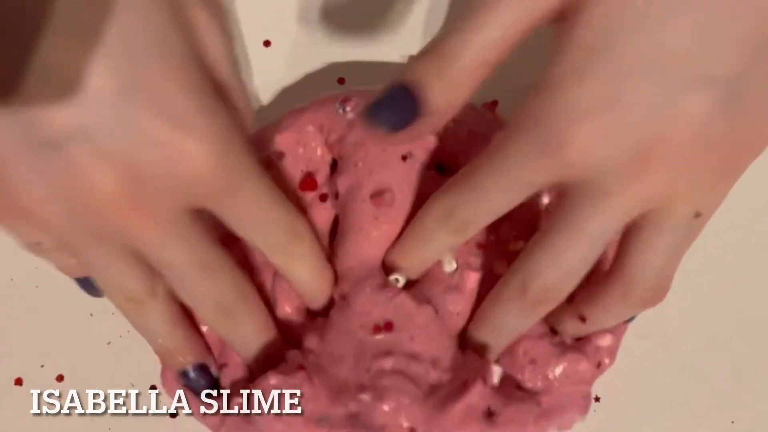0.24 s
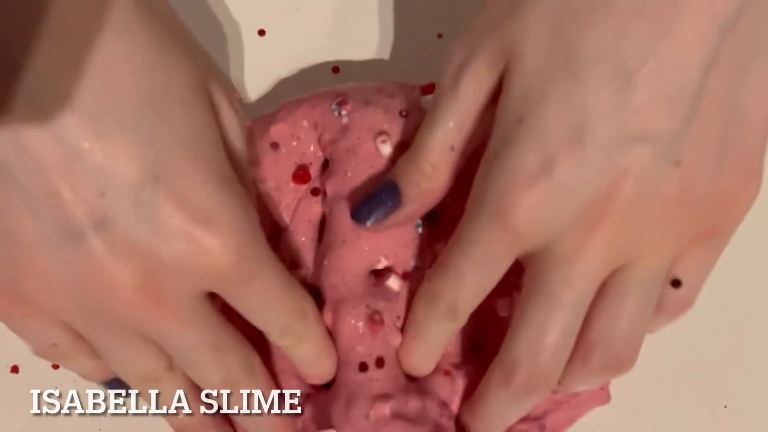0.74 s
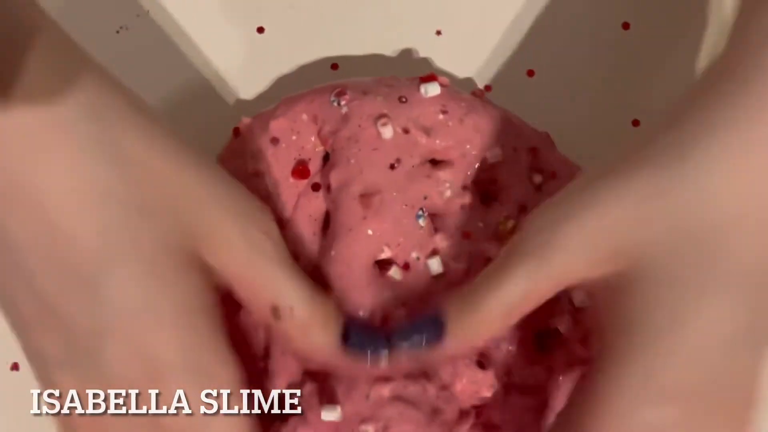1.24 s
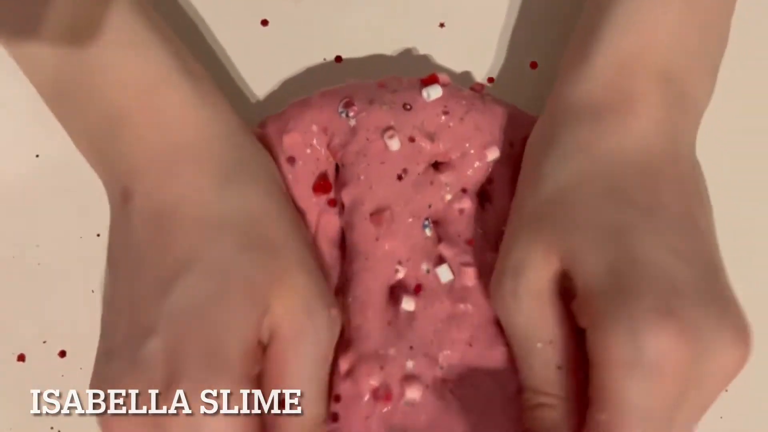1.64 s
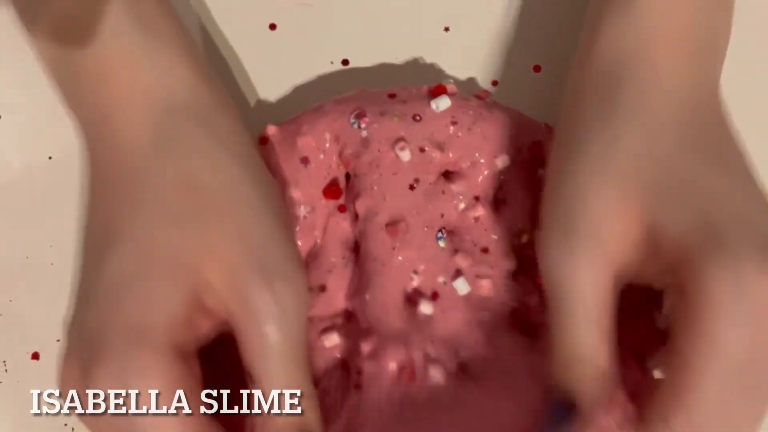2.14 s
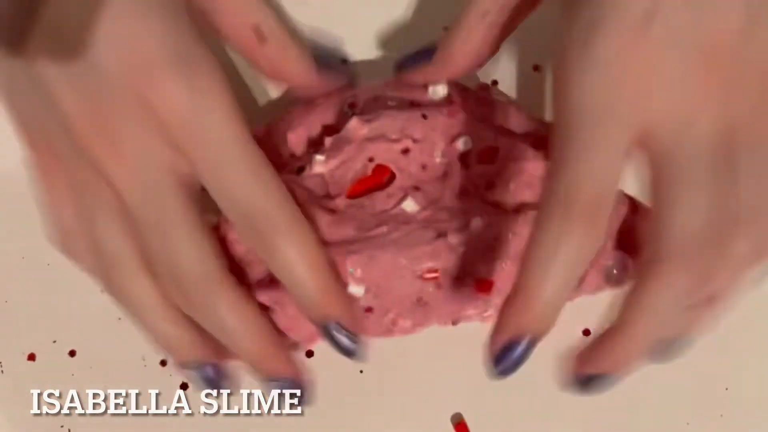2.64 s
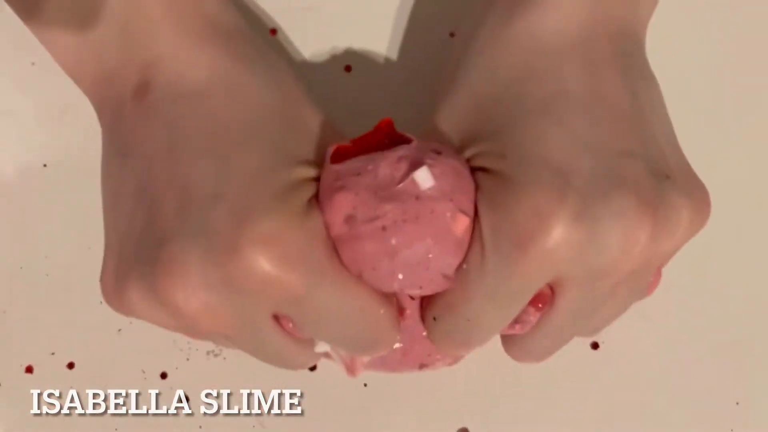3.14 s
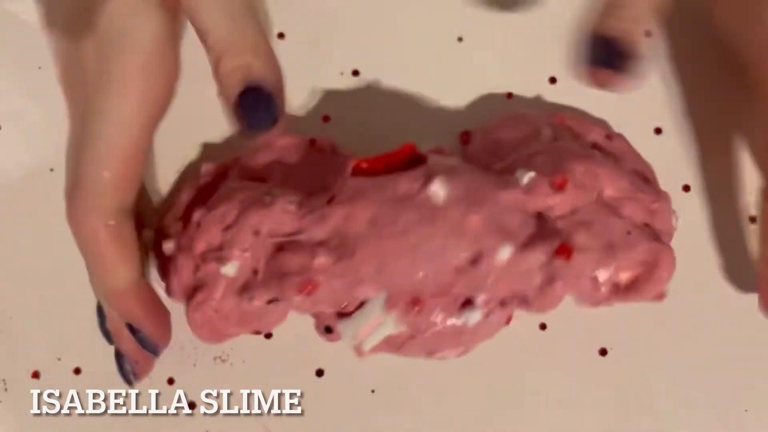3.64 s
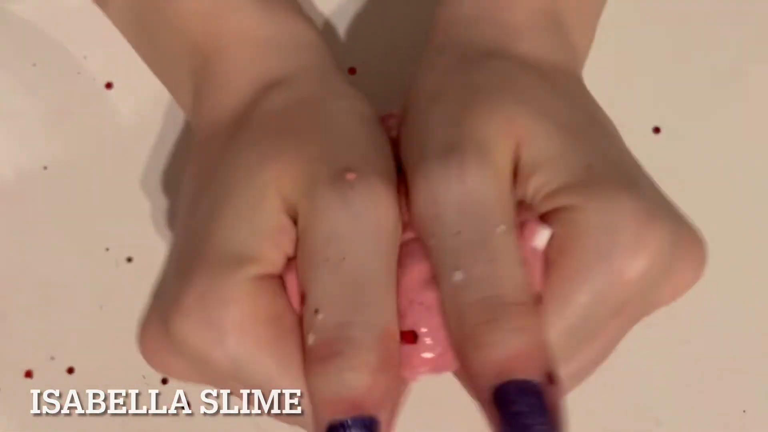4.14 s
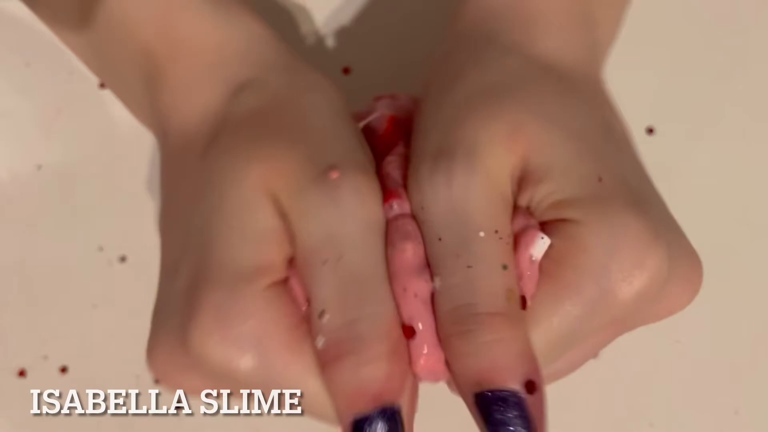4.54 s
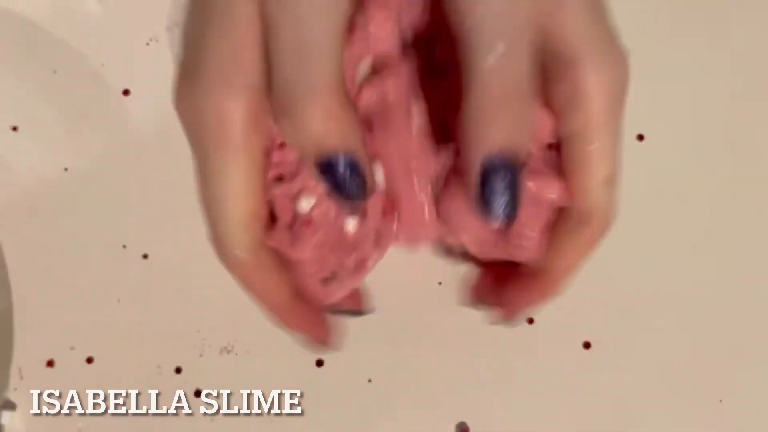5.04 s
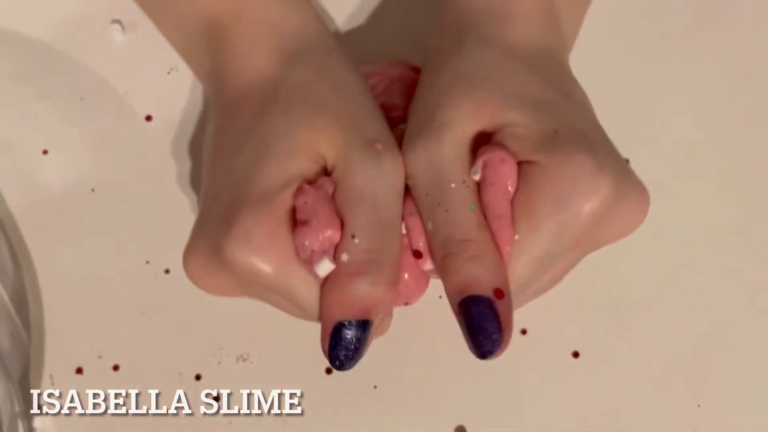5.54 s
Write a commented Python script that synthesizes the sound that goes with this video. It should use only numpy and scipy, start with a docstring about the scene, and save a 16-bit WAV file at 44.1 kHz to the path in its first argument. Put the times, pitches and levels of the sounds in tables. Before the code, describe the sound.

A very close stereo picture of two hands kneading thick slime on a table in a small, quiet room, with a short, faint reverberation. Around 0.25-0.3 s a burst of sticky crackle carries crisp snaps and hollow pops falling in pitch. After a lull, a pop at 0.77 s and a strong, rounded pop near 0.98 s lead into soft squelching and a thud at 1.2 s. It stays sparse until a sharp snap at 1.87 s, a click-like pop at 2.15 s and a lower pop with a thump at 2.33 s. From 2.5 to 3.7 s fine snaps thicken, with a rapid squeaky chirp at 3.1 s, strong sticky crackle around 3.4 s and dull thuds. The loudest cluster cracks and pops at 4.06-4.23 s. Squelches and low thuds follow from 4.55 to 5.1 s, then clicks, another chirp at 5.42 s and a final sticky press near 5.8 s. Faint wavering hum and rumble continue throughout.

```python
"""A table in a small room, a stereo microphone close by: two hands knead thick slime with small add-ins.
Film snaps are torn noise with a ringing air pocket behind, hollow pops are tones that fall in pitch, and
sticky crackle, squelch and fizz are shaped noise and tiny bubbles that follow the hands.
The lump lands in soft thuds of sagging tone, a fold chirps, and a low rumble carries a wavering hum."""
import sys
import numpy as np
from scipy import signal
from scipy.fft import rfft, irfft, next_fast_len
from scipy.io import wavfile
from scipy.ndimage import map_coordinates

SR = 44100
rng = np.random.default_rng(int(sys.argv[2]) if len(sys.argv) > 2 else 0)


def generate_wav(sig):
    """Save sig (samples, or channels by samples) to the path in sys.argv[1] as 16-bit PCM at SR."""
    pcm = np.round(np.clip(np.atleast_2d(sig).T, -1, 1) * 32767).astype(np.int16)
    wavfile.write(sys.argv[1], SR, pcm)


N = 255780


def amp(db):
    """Decibels to gain."""
    return 10 ** (np.asarray(db) / 20)


def unit(x):
    """Scale to rms 1."""
    return x / np.sqrt(np.mean(x ** 2) + 1e-20)


def along(points, hz):
    """Read (Hz, value) points on a log frequency axis."""
    point_hz, values = np.transpose(points)
    return np.interp(np.log(hz + 1), np.log(point_hz + 1), values)


def wobble(rate):
    """A smooth random curve with rate knots a second."""
    knots = rng.standard_normal(int(N * rate / SR) + 4)
    return map_coordinates(knots, [np.arange(N) * rate / SR])


def filtered(x, response):
    """Multiply the spectrum of x by a complex response of frequency."""
    size = next_fast_len(x.shape[-1] + SR // 10)
    spectrum = rfft(x, size) * response(np.fft.rfftfreq(size, 1 / SR))
    return irfft(spectrum, size)[..., :x.shape[-1]]


def coloured(x, spectrum):
    """Pass x through a causal, minimum-phase filter with the given (Hz, dB) shape."""
    size = 2048
    gain = amp(along(spectrum, np.fft.rfftfreq(size, 1 / SR)))
    # Folding the cepstrum onto positive time makes the filter causal.
    cepstrum = irfft(np.log(gain))
    cepstrum[1:size // 2] *= 2
    cepstrum[size // 2 + 1:] = 0
    impulse = irfft(np.exp(rfft(cepstrum)))
    return signal.fftconvolve(x, impulse)[:len(x)]


def resonance(centre_hz, q):
    """Response of one damped mode, unity at its centre."""
    def response(f):
        damping = 1j * f * centre_hz / q
        return damping / (centre_hz ** 2 - f * f + damping)
    return response


def add(track, s, sound):
    """Mix a sound into a track at s seconds."""
    part = track[..., round(s * SR):][..., :sound.shape[-1]]
    part += sound[..., :part.shape[-1]]


def placed(x, lead_ms, pan_db):
    """Mono to stereo: the left side of the microphone hears it earlier and louder by these amounts."""
    half = np.array([[.5], [-.5]])
    lead_s = half * lead_ms / 10 ** 3
    return amp(half * pan_db) * filtered(x, lambda f: np.exp(2j * np.pi * f * lead_s))


def burst(x, db):
    """Give a short sound the energy of one millisecond at db."""
    return amp(db) * x / np.sqrt(np.sum(x ** 2) * 10 ** 3 / SR)


def background(floor_db=-62.5, hum_db=-67, hum_hz=70, width=0.21):
    """Low rumble is shaped noise nearly alike on both sides; a hum wavers in phase and level."""
    # Spectrum of the rumble. Each row: frequency in Hz, level in dB.
    floor_shape = [(20, -35), (38, -5), (68, 1.5), (100, -0.5), (140, -10.5), (200, -5), (320, -22),
                   (700, -41.5), (2000, -41), (9000, -50), (16000, -48.5)]
    noise = rng.standard_normal((2, N))
    mid, side = unit(filtered(noise, lambda f: amp(along(floor_shape, f))))
    hum_phase = 2 * np.pi * hum_hz * np.arange(N) / SR + 1.6 * wobble(21)
    hum = unit(np.sin(hum_phase) * amp(5.9 * wobble(18)))
    rumble = np.array([mid + width * side, mid - width * side])
    return amp(floor_db) * rumble + amp(hum_db) * hum


def room(x):
    """The small room answers with a separate noise tail on each side, both fed by the right side."""
    # Reverberation. Each row: frequency in Hz, time to fall by 60 dB in s.
    decay_times = [(100, 0.3), (500, 0.096), (3000, 0.12), (9000, 0.16), (16000, 0.21)]
    # Sound sent into the room. Each row: frequency in Hz, level in dB.
    send_shape = [(100, -8.5), (600, 0.5), (2500, -7.5), (5000, -8), (9000, -12), (16000, -26.5)]
    hz, t, cells = signal.stft(rng.standard_normal((2, SR // 3)), SR, nperseg=256)
    fade = amp(-60 * t / along(decay_times, hz)[:, None])
    tail = signal.istft(cells * fade, SR, nperseg=256)[1]
    # The tail starts 2.5 ms after the direct sound.
    tail = np.pad(tail / np.linalg.norm(tail[0]), ((0, 0), (SR // 400, 0)))
    sent = coloured(x[1], send_shape)
    return signal.fftconvolve(sent[None], tail, axes=1)[:, :N]


def thuds(slap_db=-3, rough=0.68):
    """The lump meets the table: a short wet slap and a dull ring that sags in pitch."""
    # The lump pressed on the table.
    # Each row: start in seconds, ring level in dB, nominal pitch in Hz, decay in s.
    landings = [(0.775, -49.5, 181, 0.031), (1.208, -43.5, 198.6, 0.051), (1.361, -54.5, 220, 0.023),
                (2.338, -49, 170, 0.022), (2.656, -46, 191, 0.044), (3.409, -49, 168, 0.049),
                (3.615, -46.5, 219, 0.039), (3.689, -51.5, 67.7, 0.039), (4.165, -43, 88, 0.04),
                (4.588, -44, 75, 0.049), (4.822, -40.5, 238, 0.018), (4.862, -49.5, 206.4, 0.085),
                (4.952, -57, 261, 0.045), (5.09, -42.5, 123, 0.01), (5.468, -45, 90.6, 0.024)]
    sag_start, sag_end = 1.263, .88  # first and last pitch as shares of the nominal one
    sag_s = .028  # time constant of the sinking
    track, t = np.zeros(N), np.arange(SR // 4) / SR
    for s, db, hz, decay in landings:
        ring_noise, slap_noise = rng.standard_normal((2, len(t)))
        ring_mode, slap_mode = resonance(hz, q=1.6), resonance(3 * hz, q=.9)
        sagging_hz = hz * (sag_end + (sag_start - sag_end) * np.exp(-t / sag_s))
        tone = np.sin(2 * np.pi * np.cumsum(sagging_hz) / SR)
        ring = tone + rough * unit(filtered(ring_noise, lambda f: ring_mode(f) ** 2))
        ring = ring * np.exp(-t / decay) * (1 - np.exp(-t / 0.002))
        slap = unit(filtered(slap_noise, lambda f: slap_mode(f) ** 2)) * np.exp(-t / 0.0036)
        add(track, s, amp(db) * (ring + amp(slap_db) * slap))
    return placed(track, lead_ms=-0.035, pan_db=2.5)


def effort():
    """Drive levels in dB of crackle, squelch and fizz: the grip plus every stroke's rise, hold and release."""
    # Presses and pulls of the hands. Each row: start in seconds, rise in s, hold in s, crackle drive in dB,
    # squelch over crackle in dB, fizz over crackle in dB.
    strokes = [(0.159, 0.032, 0.048, -82.5, 4.5, 14), (0.255, 0.013, 0.013, -44.5, 2, -6.5),
               (0.739, 0.024, 0.0039, -74, 18.5, 10), (0.916, 0.01, 0.016, -67.5, -1.5, 0.5),
               (0.959, 0.018, 0.0073, -47.5, 4, -8), (1.008, .02, 0.038, -65.5, -6, -14),
               (1.203, 0.0057, 0.012, -61, 9.5, -3.5), (1.24, 0.026, .15, -68.5, 6, -1),
               (1.439, 0.063, 0.02, -55.5, 1.5, 0), (1.53, 0.018, 0.086, -66, 1, 0.5),
               (2.022, 0.065, 0.057, -54.5, -3.5, -1.5), (2.293, .012, .07, -60, 0.5, -1),
               (2.504, 0.0094, .01, -60.5, 0.5, -9.5), (2.747, 0.027, 0.014, -63, 6.5, 1),
               (2.803, 0.054, .015, -58.5, 8.5, 1), (2.892, 0.031, 0.1, -62, 3, 0.5),
               (3.334, 0.048, 0.052, -47, -0.5, 2.5), (3.46, 0.017, 0.025, -58.5, -2, -21),
               (3.577, 0.012, .02, -59, 0.5, -9.5), (3.709, 0.039, 0.12, -61, -4.5, -8),
               (4.134, 0.061, 0.034, -62.5, -4, 11.5), (4.28, .03, 0.082, -75, -7, 6.5),
               (4.499, .015, 0.074, -75, -5.5, 13.5), (4.557, 0.061, 0.054, -54.5, 0.5, 6),
               (4.702, .06, 0.089, -55.5, -0.5, -8), (4.903, 0.052, 0.094, -60, -8.5, -9),
               (5.018, 0.044, 0.067, -60.5, -4, -3.5), (5.256, 0.081, 0.0067, -59.5, 2, -3),
               (5.386, 0.036, 0.015, -54, -6, -3.5), (5.548, 0.026, 0.0082, -66, 4, -16),
               (5.752, 0.072, .03, -46, -4, 3)]
    # Steady grip on the lump. Each row: time in seconds, crackle drive in dB.
    grip = [(0, -67), (.17, -82), (.35, -72), (.47, -99), (.59, -69.5), (.88, -86), (1.35, -79.5),
            (1.8, -72), (2.0, -77.5), (2.45, -69.5), (2.65, -73), (3.1, -63), (3.25, -70), (4.22, -63),
            (4.42, -87), (4.7, -66), (5.52, -65.5), (5.71, -80.5)]
    grip_squelch_db, grip_fizz_db = 0.5, 0  # over the grip's crackle
    release_db_per_s = 220.5  # a stroke fades as the slime relaxes
    t = np.arange(N) / SR
    grip_db = np.interp(t, *np.transpose(grip))
    power = amp([[0], [grip_squelch_db], [grip_fizz_db]]) ** 2 * amp(grip_db) ** 2
    age = t[:SR // 2]
    for s, rise, hold, db, squelch_db, fizz_db in strokes:
        release = amp(-release_db_per_s * np.maximum(age - rise - hold, 0))
        shape = np.minimum(age / rise, 1) ** 1.55 * release
        levels = amp([[db], [db + squelch_db], [db + fizz_db]])
        add(power, s, (levels * shape) ** 2)
    return 10 * np.log10(power)


def crackle(level_db, spectrum, rate):
    """Tiny sticky threads part in clumps; harder kneading breaks more of them."""
    smear = 0.63  # unresolved threads under the single breaks
    busy = np.clip(amp((level_db - np.median(level_db)) * 2 / 3), .2, 5)
    breaks = rng.random(N) < rate * busy / SR
    sizes = amp(6 * np.minimum(rng.exponential(size=N), 3)) * rng.choice([-1, 1], N)
    # Dividing by the root of the density leaves the loudness to level_db.
    threads = unit(breaks * sizes / np.sqrt(busy)) + smear * rng.standard_normal(N)
    clumps = amp(3 * wobble(130))
    return amp(level_db) * unit(coloured(threads * clumps, spectrum))


def bubbles(level_db, rate, centre_hz, octaves, cycles, spread_db):
    """Many tiny air pockets burst, each ringing briefly at a pitch of its own."""
    count = int(rate * N / SR)
    when, pitch, size = rng.random((count, 3)).T
    hz = centre_hz * 2 ** (octaves * (2 * pitch[:, None] - 1))
    age = np.arange(SR // 60)
    turns = hz * age / SR
    envelope = np.exp(-turns / cycles) * (1 - np.exp(-turns))
    rings = amp(spread_db * size[:, None] ** 2) * np.sin(2 * np.pi * turns) * envelope
    where = (when[:, None] * N).astype(int) + age
    return amp(level_db) * unit(np.bincount(where.ravel(), rings.ravel(), N)[:N])


def kneading(sticky_db, squelch_db, fizz_db):
    """The mass squelches under each hand while skin peels from it and small bubbles burst."""
    # Spectra of the squelching mass, the sticky threads and the fizz.
    # Each row: frequency in Hz, level in dB.
    squelch_shape = [(100, -21.5), (250, 1.5), (450, -3), (900, -3), (1500, -1.5), (2500, -23), (5000, -45)]
    sticky_shape = [(600, -30.5), (1400, -18.5), (2400, 8.5), (3600, 7), (5000, 5), (6500, -1.5),
                    (12000, -29.5)]
    fizz_shape = [(3500, -31), (6400, -25.5), (7700, -7), (10000, -9.5), (12000, -32), (13300, -11),
                  (14700, -4), (16000, -25.5)]
    hands = np.zeros((2, N))
    for lead_ms, pan_db in [(0.18, 8.5), (-0.44, -10.5)]:  # left hand, right hand
        hands += placed(crackle(squelch_db - 5.5, squelch_shape, rate=900), lead_ms, pan_db)
    blips = bubbles(squelch_db - 7, rate=160, centre_hz=881.0, octaves=0.873, cycles=2.5, spread_db=27.5)
    ticks = bubbles(sticky_db - 9, rate=290, centre_hz=2863, octaves=0.567, cycles=22, spread_db=8.5)
    prickles = bubbles(fizz_db - 7.0, rate=400, centre_hz=8980, octaves=0.31, cycles=14, spread_db=12.0)
    sticky = crackle(sticky_db - 2.5, sticky_shape, rate=1100)
    fizz = crackle(fizz_db - 6, fizz_shape, rate=700)
    low = placed(sticky + ticks + blips, lead_ms=-0.054, pan_db=-2.0)
    high = placed(fizz + prickles, lead_ms=0.11, pan_db=0.0)
    return hands + low + high


def tear(decay, rise=0.0002):
    """The brief noise of a film ripping, rise and decay in seconds."""
    t = np.arange(SR // 40) / SR
    envelope = np.exp(-t / max(decay, 1 / SR)) * (1 - np.exp(-t / rise))
    return rng.standard_normal(len(t)) * envelope


def pocket(hz, decay, cycles=3.5, spatter=2.7):
    """A small air pocket rings for a few cycles, roughened by its tearing wall."""
    t = np.arange(SR // 40) / SR
    mode = resonance(hz, q=1.3)
    envelope = np.exp(-t * hz / cycles) * (1 - np.exp(-t / 0.0001))
    ring = unit(np.sin(2 * np.pi * hz * t) * envelope)
    wall = unit(filtered(tear(decay), mode))
    return filtered(ring + spatter * wall, mode)


def squeaks():
    """A fold lets air out in quick, fading chirps while its pitch drifts."""
    # Runs of chirps. Each row: start in seconds, length in s, first chirp's level in dB,
    # first pitch in Hz, pitch drifted towards in Hz.
    chirp_runs = [(1.4434, .01, -41.5, 2770, 2720), (3.106, 0.043, -31, 2910, 2520),
                  (3.808, .01, -46, 2840, 2800), (5.42, .04, -36, 2830, 2950)]
    chirp_gap_s, fade_db_per_s = .0184, 77
    track = np.zeros(N)
    for s, length, db, first_hz, last_hz in chirp_runs:
        for age in np.arange(0, length, chirp_gap_s):
            hz = first_hz + (last_hz - first_hz) * age / length
            chirp = pocket(hz, decay=0.0021, cycles=2.2, spatter=0.63)
            add(track, s + age, burst(chirp, db - fade_db_per_s * age))
    return placed(track, lead_ms=-0.053, pan_db=-2.5)


def pops(rough=0.18, spread=0.27):
    """A large pocket opens: its pitch falls as the soft wall goes slack, each at its own spot in the lump."""
    # Large air pockets venting.
    # Each row: start in seconds, level in dB, first pitch in Hz, last pitch in Hz, decay in s.
    vents = [(0.2675, -36.5, 744, 520, 0.0014), (0.2763, -28.5, 920, 520, 0.0024),
             (.287, -46.5, 820, 615, 0.012), (0.3033, -31.5, 760, 550, .006),
             (.3084, -34.5, 503, 353, 0.0047), (.7699, -28, 1090, 976, 0.0021),
             (0.8503, -38.5, 820, 710, 0.0025), (0.9774, -20, 1090, 750, 0.0018),
             (0.984, -29.5, 565, 384, 0.0062), (1.2044, -41.5, 1015, 403, 0.0063),
             (1.4955, -42.5, 1300, 774, 0.0033), (1.8743, -36.5, 1640, 683, 0.002),
             (2.1551, -30, 1640, 1620, 0.00097), (2.3345, -25, 496, 345, .0038),
             (2.874, -39, 690, 600, 0.0048), (3.406, -32.5, 970, 886, 0.0067),
             (4.066, -40.5, 590, 380, 0.0053), (4.082, -29, 1010, 152, 0.0045),
             (4.1435, -29, 1470, 1240, 0.0026), (4.162, -43.5, 425, 117, 0.0084),
             (4.2128, -31, 960, 136, 0.0037), (5.2452, -43, 485, 338, 0.0026),
             (5.277, -45.5, 520, 378, 0.0094), (5.404, -47, 1010, 620, 0.003),
             (5.584, -37, 974, 872, 0.0026)]
    glide_share = .36  # time constant of the pitch fall, as a share of the decay
    track, t = np.zeros((2, N)), np.arange(SR // 12) / SR
    for s, db, first_hz, last_hz, decay in vents:
        hz = last_hz + (first_hz - last_hz) * np.exp(-t / (glide_share * decay))
        air = unit(filtered(rng.standard_normal(len(t)), resonance(first_hz, q=6.1)))
        ring = np.sin(2 * np.pi * np.cumsum(hz) / SR) + rough * air
        pop = amp(db) * ring * np.exp(-t / decay) * (1 - np.exp(-t / 0.00016))
        lead_ms = -0.3 * (1 + spread * rng.uniform(-1.7, 1))
        add(track, s, placed(pop, lead_ms, pan_db=-3.0))
    return track


def stray_snaps(crackle_db):
    """Rows of faint snaps at random moments, stronger while the hands work harder, up to a ceiling."""
    per_s, top_db = 14, -50.5  # the ceiling is on the crackle drive they follow
    crack_db, pocket_db, spread_db = 9.5, 10, 9  # first two over that drive, then a random spread
    centre_hz, octaves, decay_s = 2980, 0.36, 0.0024
    rows = []
    for when, size, hollow, pitch in rng.random((int(per_s * N / SR), 4)):
        db = min(crackle_db[int(when * N)], top_db)
        rows.append((when * N / SR,
                     db + crack_db + spread_db * (2 * size - 1),
                     db + pocket_db + spread_db * (2 * hollow - 1),
                     centre_hz * 2 ** (octaves * (2 * pitch - 1)),
                     decay_s))
    return rows


def snaps(rows):
    """The film tears with a bright crack, the freed air gives one short push, and the pocket behind rings."""
    # Spectrum of the crack. Each row: frequency in Hz, level in dB.
    crack_shape = [(500, -10), (3000, -20.5), (6300, -5), (7700, 5.5), (10000, 6.5), (12300, 1),
                   (14300, 12), (15500, -5), (16500, -26)]
    push_db, push_s = -15, .00012  # puff of freed air: level over the crack, time constant
    cracks, pockets = np.zeros(N), np.zeros(N)
    u = np.arange(SR // 100) / SR / push_s
    push = (1 - u) * np.exp(-u)
    for s, crack_db, pocket_db, pocket_hz, decay in rows:
        add(cracks, s, burst(coloured(tear(decay), crack_shape), crack_db))
        add(pockets, s, burst(pocket(pocket_hz, decay), pocket_db))
        add(pockets, s, burst(push, crack_db + push_db))
    pockets = filtered(pockets, lambda f: 1 / (1 + (f / 6500) ** 8))  # soft walls swallow the top
    return placed(cracks, lead_ms=0.1147, pan_db=0.2) + placed(pockets, lead_ms=-0.051, pan_db=-2.0)


def scene():
    """Slime close to the microphone, its room, and the background."""
    # Bursting film.
    # Each row: start in seconds, crack level in dB, air pocket level in dB, pocket pitch in Hz, decay in s.
    film_breaks = [(0.078, -48.5, -53, 1690, 0.0015), (0.2746, -26.5, -30, 2100, 0.0014),
                   (0.3011, -22.5, -29, 2480, 0.0029), (0.7706, -50, -46, 1310, 0.0018),
                   (0.9815, -27, -35, 2140, 0.0013), (0.9999, -35.5, -60, 2990, .0012),
                   (1.0348, -46.5, -44, 2300, 0.0034), (1.0764, -38, -32.5, 4970, 0.0013),
                   (1.1528, -59.5, -51, 4940, 0.0023), (1.4954, -64, -40, 1460, 0.0022),
                   (1.7466, -52, -56, 6100, 0.0018), (1.8734, -26, -23.5, 4100, 0.0013),
                   (1.8765, -30.5, -27.5, 5150, 0.00067), (2.1569, -52, -38.5, 1510, 0.0022),
                   (2.2996, -46.5, -41.5, 2920, 0.0019), (2.3336, -67, -43, 1580, 0.0025),
                   (2.3713, -39.5, -43, 3500, 0.0067), (2.4468, -59, -46.5, 2370, 0.0047),
                   (2.511, -34.5, -39, 3800, 0.0018), (2.8914, -36.5, -51, 2730, 0.00018),
                   (2.9376, -60, -42.5, 2470, 0.0015), (2.9477, -54, -42, 2030, 0.0011),
                   (2.9796, -31.5, -50, 4230, 0.00036), (3.0012, -39, -57, 3850, .0005),
                   (3.0154, -29.5, -39, 3800, 0.00033), (3.0582, -45, -39, 3180, 0.0034),
                   (3.0714, -48, -40.5, 3200, 0.00065), (3.2762, -45, -69, 2840, 0.00054),
                   (3.3539, -29.5, -45, 4000, 0.0001), (3.3708, -25, -33, 4950, 0.00021),
                   (3.4827, -38.5, -43, 3160, 0.0014), (3.5072, -32, -47, 3900, 0.00083),
                   (3.531, -28, -43, 5170, 0.00056), (3.597, -42.5, -48, 3900, 0.0026),
                   (3.6318, -43.5, -48, 3470, 0.0023), (4.0637, -17.5, -30, 6340, 0.00096),
                   (4.0814, -23.5, -29, 3320, 0.0013), (4.1032, -53, -38.5, 2960, .0009),
                   (4.1333, -39.5, -38, 1330, 0.0034), (4.1437, -23, -30.5, 2240, 0.0014),
                   (4.161, -11.5, -20.5, 5400, .0006), (4.2115, -26, -33.5, 2230, 0.0012),
                   (4.2346, -25, -39.5, 5300, 0.00034), (4.3341, -45.5, -74, 2430, 0.00073),
                   (4.444, -42.5, -68, 3750, 0.00013), (4.5009, -45, -60, 4070, 0.00054),
                   (4.553, -51, -47.5, 3800, 0.0015), (4.7809, -36, -41, 3360, 0.002),
                   (4.8204, -40, -38, 3720, 0.0031), (4.8961, -41.5, -43, 2980, .0014),
                   (4.9163, -45, -41.5, 4160, 0.0047), (5.2422, -28.5, -29.5, 4290, 0.00055),
                   (5.2874, -30.5, -35, 3120, 0.0012), (5.4027, -28, -44, 3360, 0.00042),
                   (5.4104, -34.5, -53, 4160, 0.00054), (5.5224, -44, -43, 3520, 0.00042),
                   (5.584, -48, -46, 3440, 0.0012), (5.7973, -30, -36, 3550, 0.00034)]
    sticky_db, squelch_db, fizz_db = effort()
    bursts = snaps(film_breaks) + squeaks()
    hollow = pops()
    mass = kneading(sticky_db, squelch_db, fizz_db) + thuds() + snaps(stray_snaps(sticky_db))
    wet = room(amp(-4.0) * bursts + amp(-6.0) * hollow + amp(-7) * mass)
    return bursts + hollow + mass + wet + background()


def record(dry):
    """The recorder cuts steeply above its band limit."""
    top_hz = 16500
    return filtered(dry, lambda hz: 1 / np.sqrt(1 + (hz / top_hz) ** 160))


dry = scene()
out = record(dry)
generate_wav(out)
```